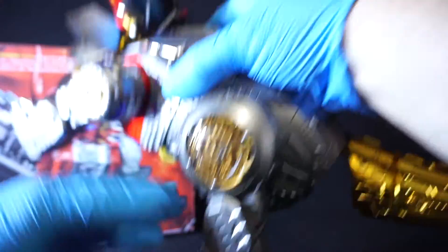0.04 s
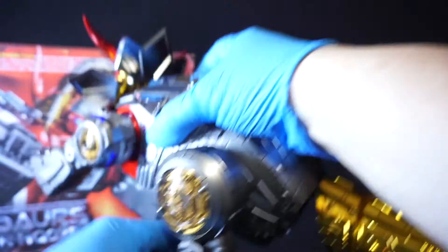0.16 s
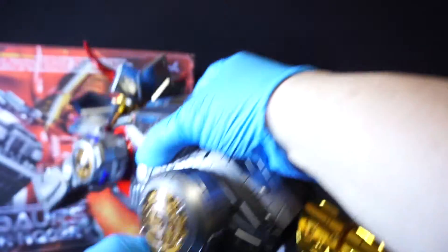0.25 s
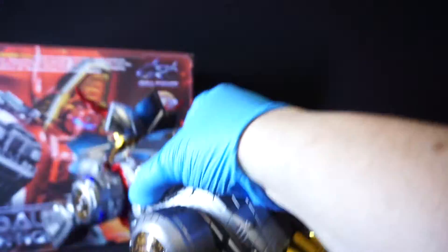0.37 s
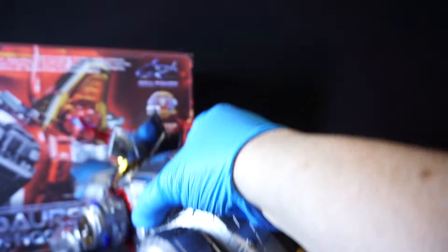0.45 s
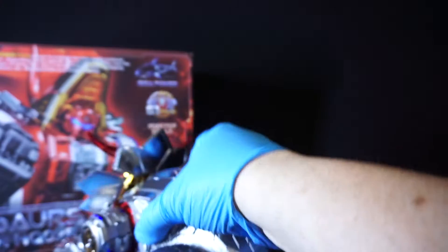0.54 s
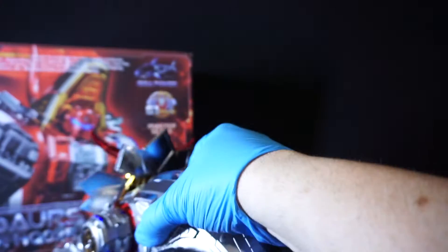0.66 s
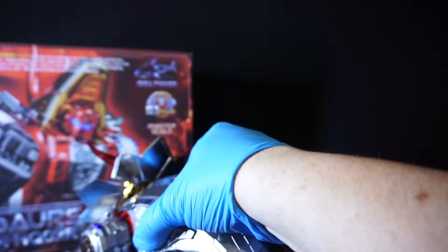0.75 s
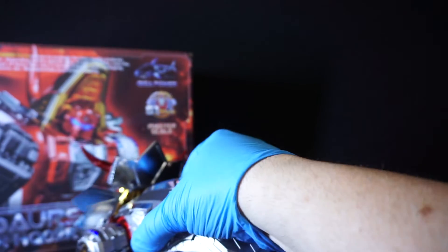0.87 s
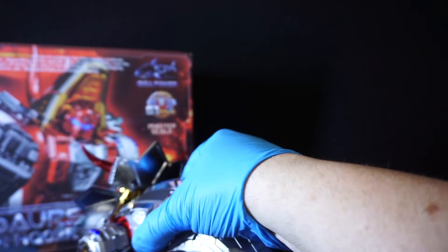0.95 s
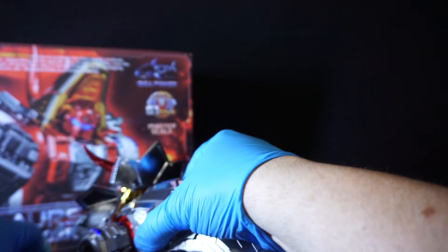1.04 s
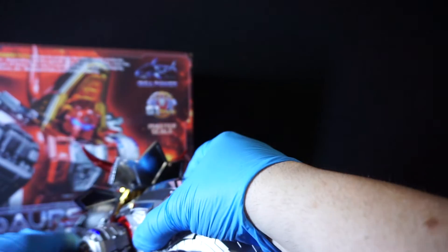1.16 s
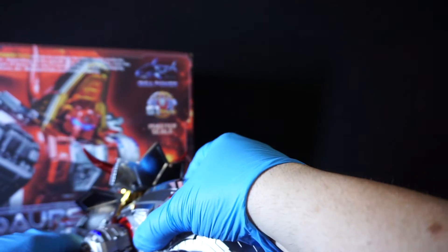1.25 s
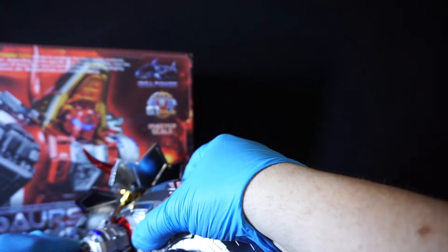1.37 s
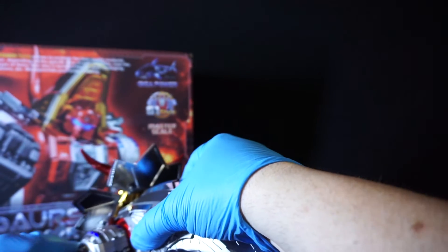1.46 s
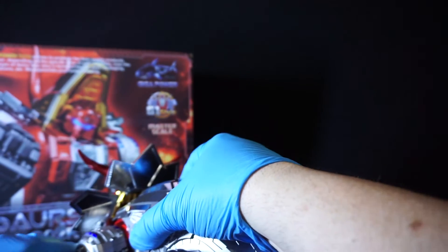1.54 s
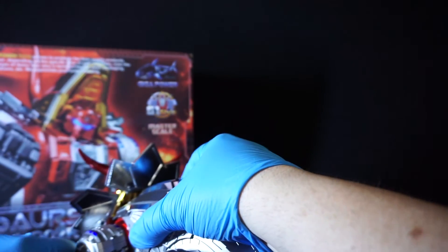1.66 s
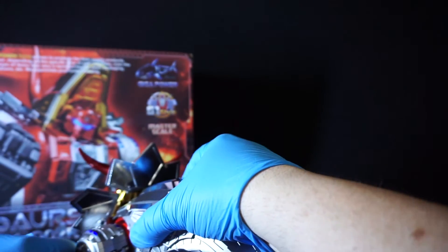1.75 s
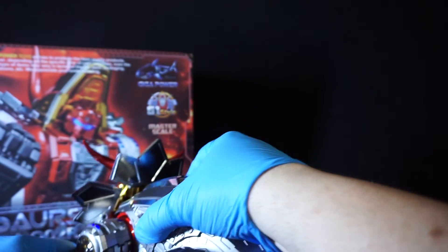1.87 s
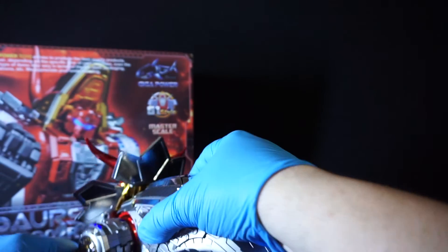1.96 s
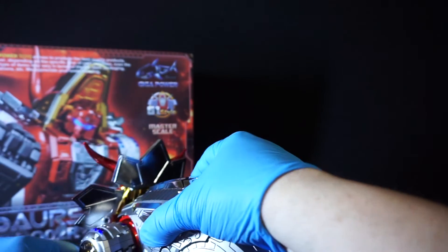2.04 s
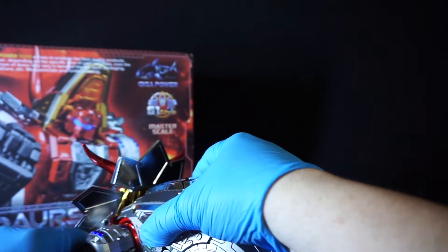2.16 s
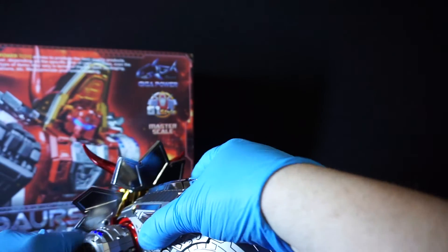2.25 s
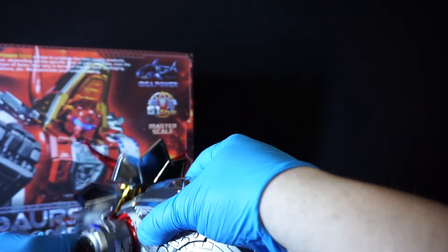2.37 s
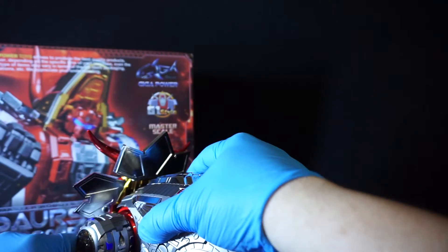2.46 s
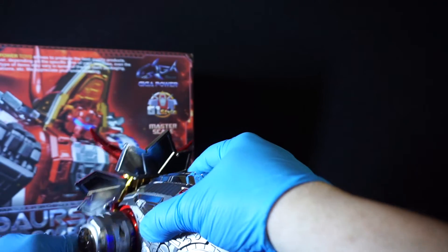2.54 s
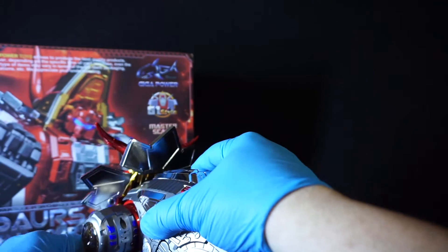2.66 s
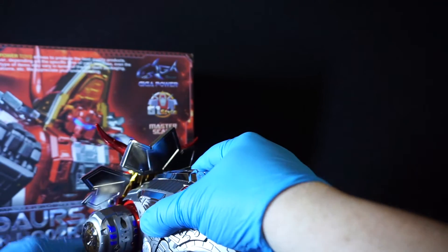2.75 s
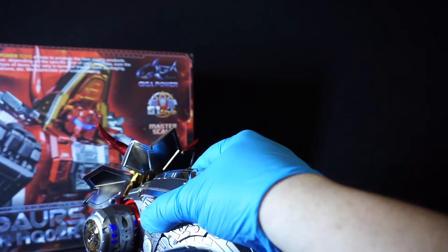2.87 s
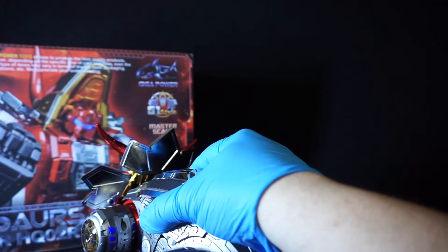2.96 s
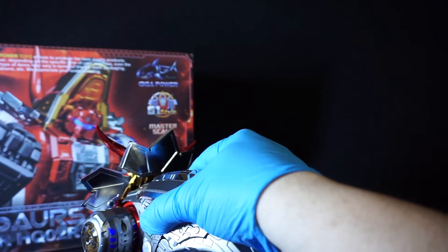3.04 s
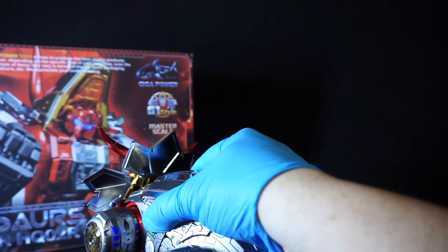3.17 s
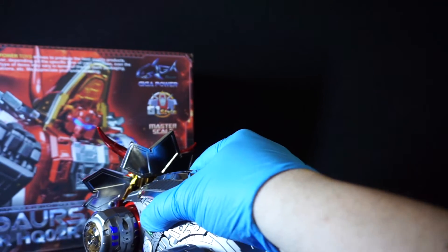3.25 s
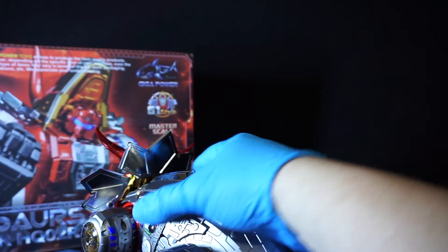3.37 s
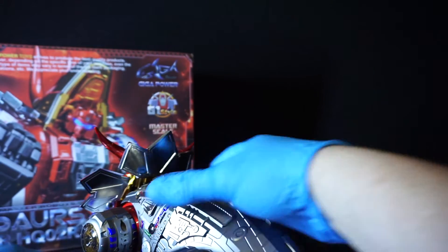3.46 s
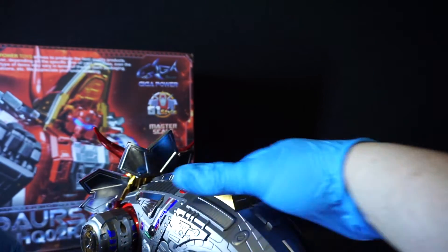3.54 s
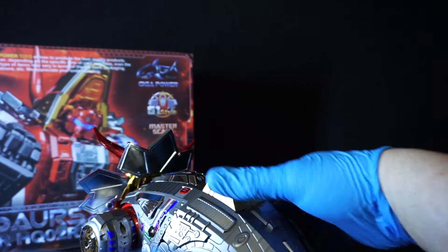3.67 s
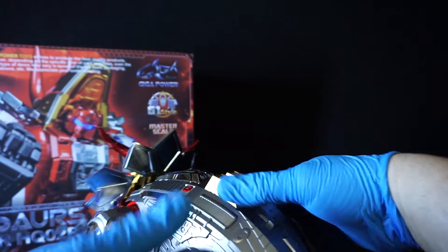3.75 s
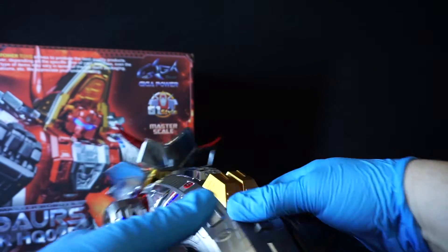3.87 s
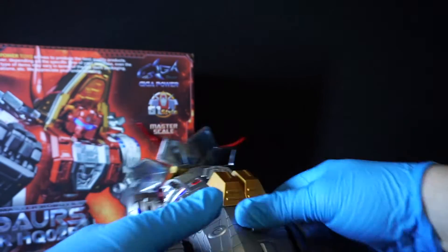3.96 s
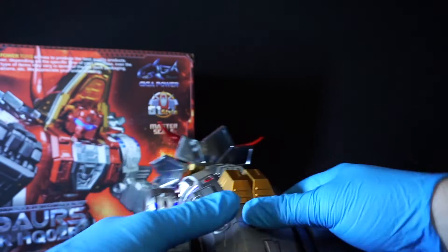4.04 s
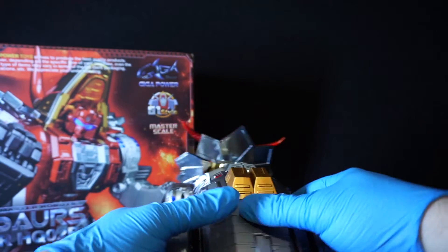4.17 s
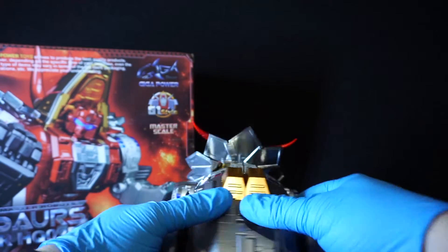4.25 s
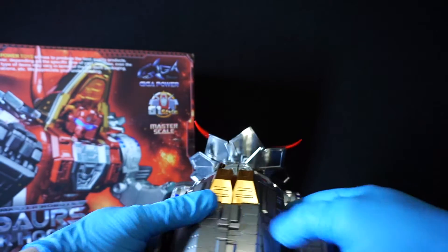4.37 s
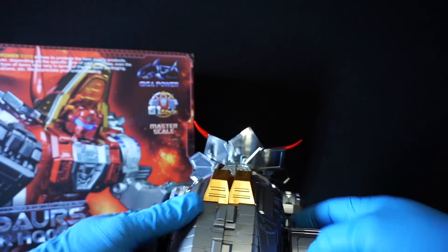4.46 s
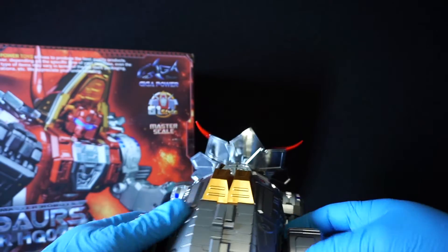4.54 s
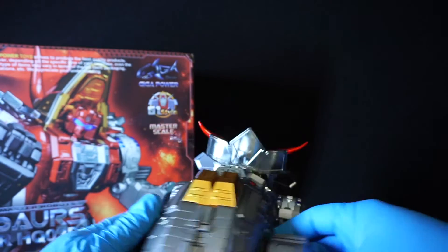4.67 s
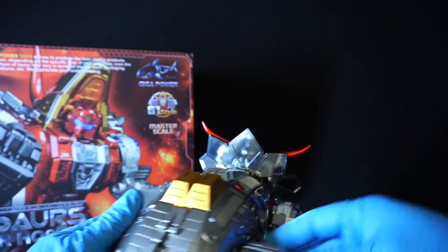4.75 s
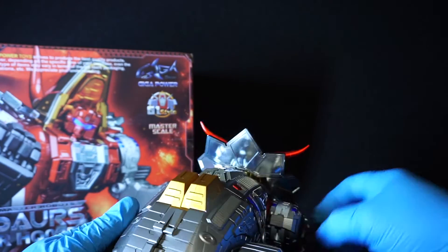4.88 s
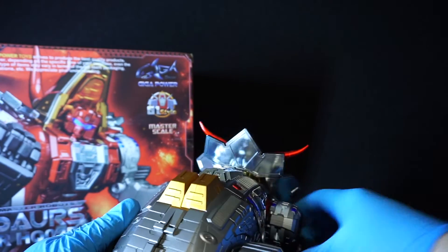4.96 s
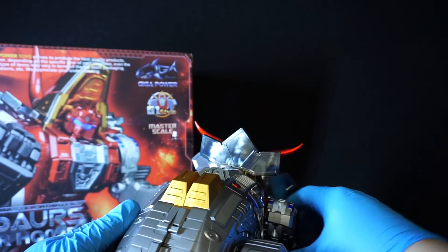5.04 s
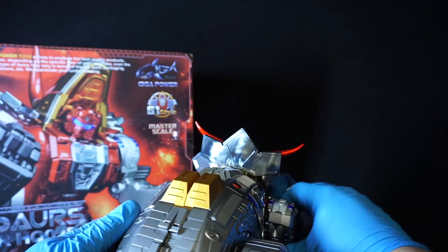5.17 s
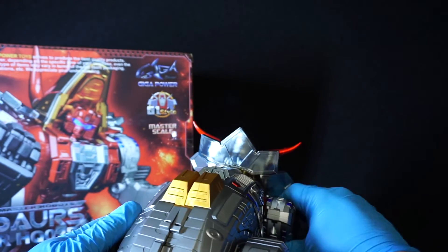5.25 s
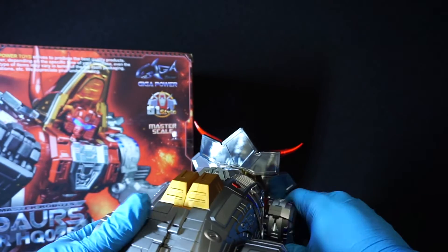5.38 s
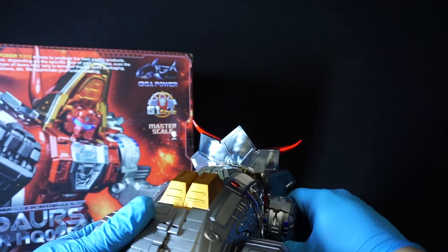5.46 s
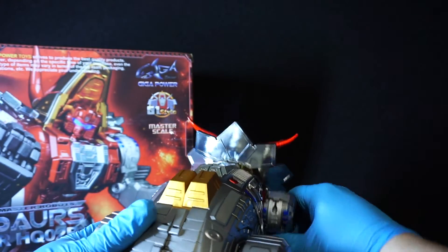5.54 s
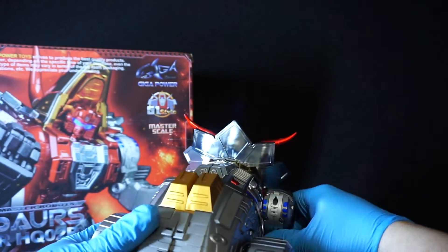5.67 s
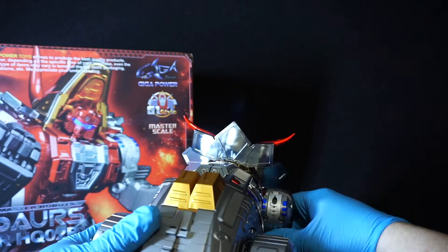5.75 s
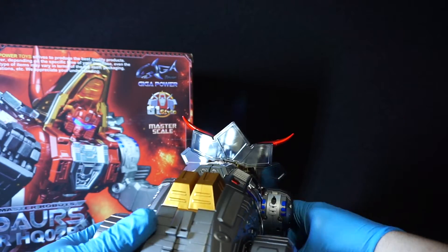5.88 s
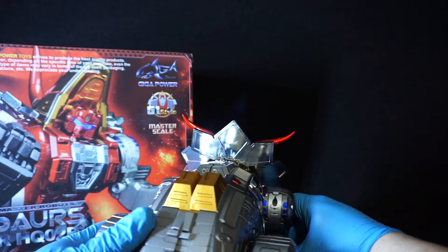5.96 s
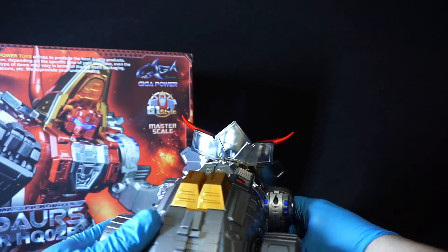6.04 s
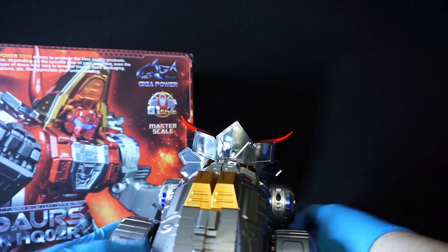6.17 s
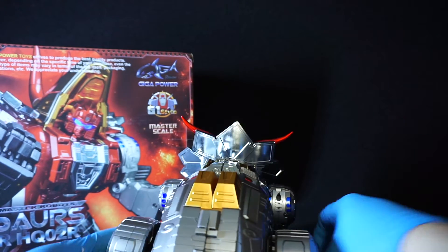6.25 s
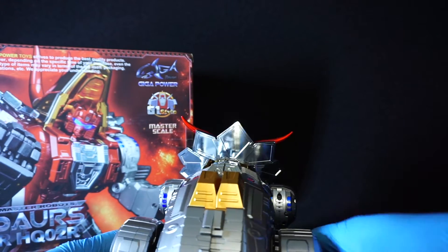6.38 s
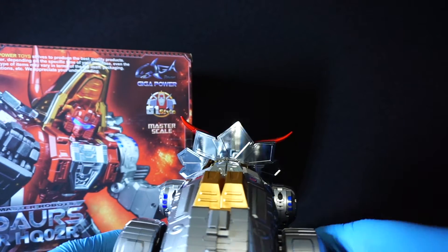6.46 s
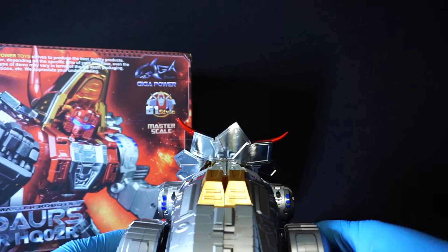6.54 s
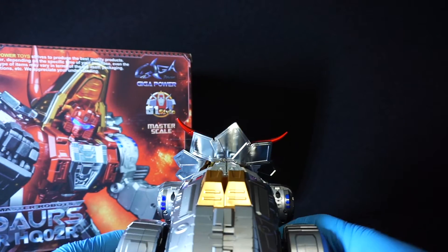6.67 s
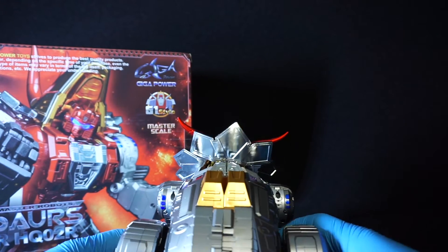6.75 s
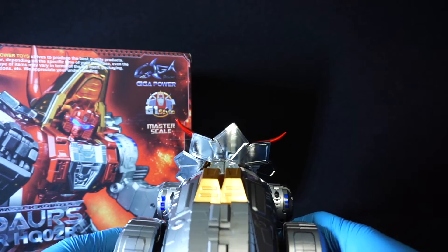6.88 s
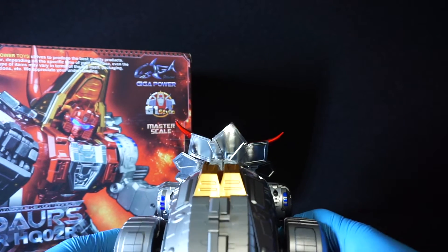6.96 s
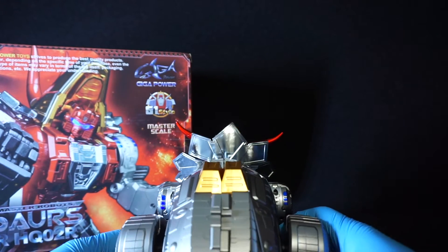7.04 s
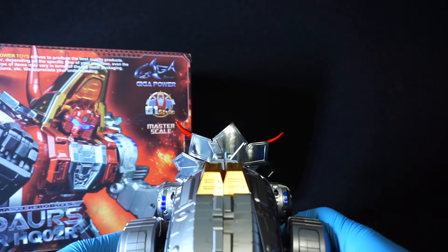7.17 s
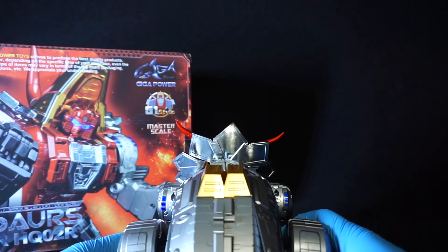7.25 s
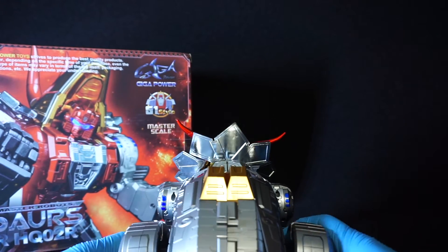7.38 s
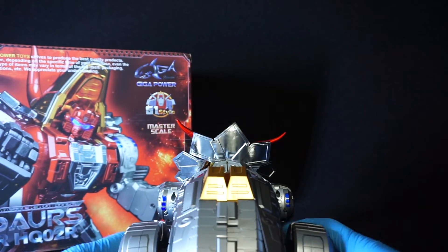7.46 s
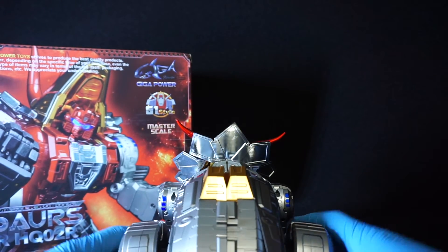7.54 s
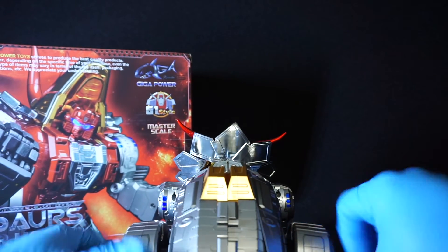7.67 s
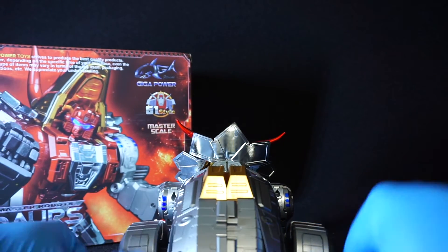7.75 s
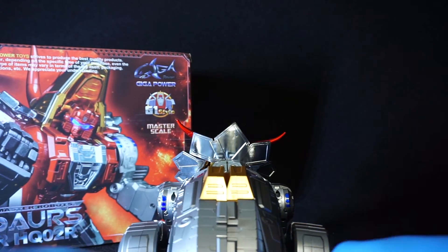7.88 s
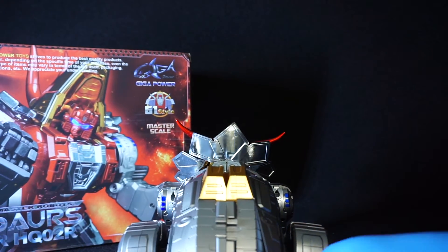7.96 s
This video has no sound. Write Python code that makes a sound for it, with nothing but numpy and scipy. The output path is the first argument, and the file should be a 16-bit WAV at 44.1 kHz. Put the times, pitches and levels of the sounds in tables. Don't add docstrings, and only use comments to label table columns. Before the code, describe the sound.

Close, busy handling of a big plastic toy: sharp clacks, rubbery rubs, woody scrapes, two bursts of bright ratchet snaps, then quieter small clicks.

```python
import sys
import numpy as np
from scipy import signal
from scipy.fft import rfft, irfft, next_fast_len
from scipy.io import wavfile
from scipy.ndimage import uniform_filter1d

SR = 44100
rng = np.random.default_rng(int(sys.argv[2]) if len(sys.argv) > 2 else 0)


def amplitude_ratio(level_db):
    exponent = np.asarray(level_db, float) / 20
    return 10 ** exponent


def master_out(mix):
    frames = np.transpose(np.atleast_2d(mix))
    ceiling = np.clip(frames, -1, 1)
    pcm = np.round(ceiling * 32767).astype(np.int16)
    wavfile.write(sys.argv[1], SR, pcm)


N = 353241
ECHO_S = .0075


def evened(x):
    return x / np.sqrt(np.mean(x ** 2) + 1e-20)


def read(points, hz):
    f, value = np.transpose(points)
    return np.interp(np.log(hz + 1), np.log(f + 1), value)


def add(mix, s, sound):
    part = mix[..., round(s * SR):][..., :sound.shape[-1]]
    part += sound[..., :part.shape[-1]]


def echoed(x, delay_s, db):
    return amplitude_ratio(db) * np.roll(x, round(delay_s * SR), 1)


def side_gain(left_minus_right_db):
    return amplitude_ratio(np.array([[.5], [-.5]]) * left_minus_right_db)


# (frequency [Hz], likeness [0 to 1])
LIKENESS = [(60, 0.96), (150, 0.93), (300, 0.52), (700, 0.67), (1300, 0.28), (2500, 0.54), (6000, 0.025),
            (12000, 0.023)]


def noise(spectrum, patchy_db, n_samples, size=512):
    hop = size // 2
    hz = np.fft.rfftfreq(size, 1 / SR)
    a, b, c, d, patches = rng.standard_normal((n_samples // hop + 5, len(hz), 5)).T
    patches = uniform_filter1d(patches, size=6, axis=0)
    patches = evened(uniform_filter1d(patches, size=4, axis=1))
    same = np.clip(read(LIKENESS, hz), -1, 1)[:, None]
    left = a + 1j * b
    right = same * left + np.sqrt(1 - same ** 2) * (c + 1j * d)
    z = np.array([left, right]) * amplitude_ratio(read(spectrum, hz)[:, None] + patchy_db * patches)
    return evened(signal.istft(z, nperseg=size, noverlap=size - hop)[1][:, :n_samples])


def strokes(rows, rise, fall, rest_db):
    t = np.arange(N) / SR
    power = amplitude_ratio(2 * rest_db)
    for s, hold, db in rows:
        before, after = np.maximum(s - t, 0), np.maximum(t - s - hold, 0)
        power = power + amplitude_ratio(2 * (db - rise * before - fall * after))
    return np.sqrt(power)


def ring(lo_hz, hi_hz, t60):
    t = np.arange(int(t60 * 1.2 * SR)) / SR
    count = int(np.clip((hi_hz - lo_hz) / 150, 5, 36))
    place, size, phase, turn = rng.random((4, 50, 1))[:, :count]
    hz = lo_hz + (hi_hz - lo_hz) * (np.arange(count)[:, None] + place) / count
    turn = (turn - .5) * 2.4 * (1 - np.clip(read(LIKENESS, hz), 0, 1))
    onset = 1 - np.exp(-t / (.0003 + .15 / lo_hz))
    fade = amplitude_ratio(-60 * t / (t60 * (.7 + .6 * size))) * onset
    both = [(fade * np.sin(2 * np.pi * (hz * t + phase) + side * turn)).sum(0) for side in (1, -1)]
    return np.array(both) / np.abs(both).max()


def room_tail(power, parts, diffuse, swell_s):
    out = np.zeros((2, N))
    size = next_fast_len(N)
    hz = np.fft.rfftfreq(size, 1 / SR)
    for impulses, (lo, hi, _, t60) in zip(power, parts):
        dying = signal.lfilter([1], [1, -amplitude_ratio(-60 / t60 / SR) ** 2], impulses)
        swelling = signal.lfilter([1], [1, -np.exp(-1 / (swell_s * SR))], impulses)
        band = [(max(.78 * lo, lo - 1500), -30), (lo, 0), (hi, -3), (min(1.4 * hi, hi + 1700), -30)]
        tail = irfft(diffuse * amplitude_ratio(read(band, hz)), size)[:, :N]
        out += np.sqrt(abs(dying - swelling)) * evened(tail)
    return out


def strikes(rows, parts, diffuse, db, room_db, echo_db, swell_s=0.0077, bounce_db=-80, far_db=-18):
    out, power = np.zeros((2, N)), np.zeros((len(parts), N))
    for s, peak_db, *shares_db in rows:
        blow_db = db + peak_db + .5 * max(peak_db + 26.5, 0)
        side = side_gain(sum(shares_db[len(parts):]))
        for k, (lo, hi, t60, _) in enumerate(parts):
            part_db = blow_db + shares_db[k]
            add(out, s, amplitude_ratio(part_db) * side * ring(lo, hi, t60))
            power[k, round((s + .004) * SR)] += amplitude_ratio(2 * (part_db + room_db))
    out += echoed(out, .0017, bounce_db)
    out += echoed(out, ECHO_S, echo_db) + echoed(out, .0243, far_db)
    return out + room_tail(power, parts, diffuse, swell_s)


# (middle [s], half length [s], dip [dB], above 0 no drop)
LULLS = [(.12, 0.1, -1.5), (0.497, 0.034, -2.5), (1.084, .03, 4), (3.012, .02, -4), (3.26, .05, 3),
         (3.53, 0.11, -1), (4.9, .04, 17), (5.202, 0.029, 1), (5.904, .04, -6), (6.286, 0.086, -3.5),
         (6.624, 0.043, -4.5), (6.738, 0.032, -5.5), (7.166, 0.068, -5), (7.326, 0.043, -9)]


def lulls():
    t = np.arange(N) / SR
    return amplitude_ratio(sum(np.minimum(db, 0) * np.exp(-((t - s) / half) ** 4) for s, half, db in LULLS))


# (frequency [Hz], level [dB per Hz])
AIR = [(12, -47), (20, -30), (135, 14), (492, -16.5), (863, 4), (1280, -45), (3140, -34), (12800, -8.5),
       (15200, -19), (16500, -9)]


def still_air():
    return amplitude_ratio(-61.5) * lulls() * noise(AIR, 0.23, N, size=1024)


# (time [s], level [dB])
LOAD = [(0, -57.5), (.45, -62), (.7, -50), (1.0, -60.5), (1.55, -55), (2.2, -50), (2.45, -50.5),
        (2.76, -70.5), (3.1, -50.5), (3.52, -60.5), (3.8, -65.5), (4.25, -65.5), (5.1, -58.5), (5.4, -58),
        (5.78, -59), (5.95, -74.5), (7.6, -63), (8.0, -57.5)]
# (frequency [Hz], level [dB per Hz])
RUMBLE = [(20, -31), (50, -11), (86, -20.5), (136, -0.5), (151, -6.5), (183, -13.5), (274, -5.5),
          (329, -16.5), (375, -11), (450, -10), (580, -48), (990, -120)]


def rumble():
    load_db = np.interp(np.arange(N) / SR, *np.transpose(LOAD))
    return amplitude_ratio(2.0 + load_db) * noise(RUMBLE, 4.4, N, size=2048)


# (start [s], hold [s], level [dB])
SWAYS = [
    (.5, .25, -54.5),
    (1.1, 0.34, -57.5),
    (1.9, 0.076, -51),
    (3.05, 0.2, -63),
    (3.7, 0.23, -56),
    (4.5, 0.79, -64),
    (5.25, 0.074, -60),
    (5.38, 0.36, -45),
    (6.8, 0.14, -64),
    (7.55, 0.41, -63),
]
# (frequency [Hz], level [dB per Hz])
SWAY = [(12, -37), (22, -9), (70, -3.5), (110, -6.5), (200, -58)]


def sway():
    return strokes(SWAYS, 120, 88, -72) * noise(SWAY, 4.5, N, size=4096)


# (start [s], hold [s], level [dB])
SLIDES = [(0, 0.056, -59.5), (5.98, 0.033, -59), (.44, 0.21, -57), (1.3, 0.23, -55.5), (1.8, .06, -53),
          (2.13, 0.2, -48), (2.45, 0.02, -38.5), (2.76, 0.022, -53.5), (3.07, 0.11, -50),
          (4.38, 0.093, -54), (4.57, 0.17, -54.5), (4.72, 0.13, -52), (5.1, 0.036, -67), (5.4, 0.32, -40.5),
          (6.07, 0.026, -64.5), (6.5, 0.047, -57), (6.86, 0.12, -66.5), (7.68, .03, -83)]
# (rise [dB/s], fall [dB/s], rest level [dB])
SLIDE_SHAPE = (125, 310, -69)
# (frequency [Hz], level [dB per Hz])
SLIDE = [(150, -24), (250, -30), (414, -19), (451, -19), (795, 18), (915, 10), (1030, -85), (1600, -7),
         (2080, -54), (3520, -120)]


def slides():
    return strokes(SLIDES, *SLIDE_SHAPE) * noise(SLIDE, 3.0, N)


# (start [s], hold [s], level [dB])
DRAGS = [(0, 0.077, -63.5), (.42, 0.099, -54.5), (1.3, 0.15, -53.5), (1.49, 0.056, -49),
         (1.65, 0.045, -54.5), (1.84, 0.052, -40), (1.95, 0.19, -48.5), (2.41, 0.08, -38.5),
         (2.58, 0.1, -41.5), (3.76, 0.15, -53.5), (4.45, .25, -63), (5.0, 0.26, -62.5), (5.41, 0.33, -41),
         (6.39, 0.23, -64), (6.65, 0.06, -75), (7.19, 0.024, -62), (6.9, 0.29, -60), (7.66, 0.41, -55.5)]
# (rise [dB/s], fall [dB/s], rest level [dB])
DRAG_SHAPE = (270, 250, -69.5)
# (frequency [Hz], level [dB per Hz])
DRAG = [(760, -11.5), (1300, -2), (1630, -5.5), (1910, 1), (2320, -1.5), (2670, -3.5), (4200, -7),
        (5460, -24), (9240, -120)]


def drags():
    return strokes(DRAGS, *DRAG_SHAPE) * noise(DRAG, 2.6, N, size=256)


# (start [s], hold [s], level [dB])
SINGS = [
    (1.46, 0.064, -66),
    (3.76, .18, -54.5),
    (4.03, 0.13, -65),
    (6.65, 0.044, -73),
]
# (frequency [Hz], level [dB per Hz])
SING = [(1500, -40), (1900, -9), (2000, -9), (2250, -37), (2620, -5), (2780, -1), (3200, -17), (4500, -48)]


def sings():
    return strokes(SINGS, 200, 300, -90) * noise(SING, 3.4, N)


# (start [s], hold [s], level [dB])
RUBS = [(.43, 0.037, -48), (.66, 0.044, -36.5), (.85, 0.025, -43.5), (.93, 0.03, -45.5), (1.84, .04, -45),
        (2.12, 0.13, -49.5), (2.78, 0.082, -53), (0.05, 0.13, -67), (1.1, 0.63, -64), (3.34, 0.042, -72),
        (5.15, 0.34, -60), (3.8, 0.15, -46.5), (4.02, 0.48, -47.5), (4.6, 0.099, -43), (4.74, 0.042, -37.5),
        (5.06, 0.027, -47.5), (5.94, 0.061, -46), (6.17, 0.05, -48.5), (6.37, 0.026, -53),
        (6.47, 0.037, -54), (6.65, .06, -59), (6.78, 0.04, -74), (6.9, 0.17, -77), (7.4, 0.063, -59),
        (7.26, 0.085, -72), (3.45, 0.48, -63), (6.04, 0.11, -54), (6.57, 0.038, -67), (7.12, 0.035, -66),
        (2.97, 0.026, -59), (7.5, 0.36, -53), (7.67, 0.038, -47), (7.85, 0.028, -44.5), (7.93, 0.098, -54)]
# (rise [dB/s], fall [dB/s], rest level [dB])
RUB_SHAPE = (226, 246, -61.5)
# (frequency [Hz], level [dB per Hz])
GLOVE = [(2350, -18.5), (3670, -11), (4400, -11.5), (5300, -11), (6300, -12.5), (14700, -14.5),
         (16200, -18), (16500, -54)]


def rubs():
    return strokes(RUBS, *RUB_SHAPE) * noise(GLOVE, 0.52, N, size=256)


def friction_grain():
    slips = amplitude_ratio(0.61 * rng.exponential(1, N)) * (rng.random(N) < 300 / SR)
    return evened(9.0 + signal.lfilter([1], [1, -np.exp(-1 / (0.0085 * SR))], slips))


def hands():
    friction = rubs() + drags() + sings() + slides()
    return friction_grain() * lulls() * friction + rumble() + sway()


# (time [s], strength [dB], boom of the table top [dB])
THUDS = [(0.294, -35, -29), (0.595, -23, 3), (1.116, -46.5, 6), (1.182, -35, -12.5), (1.402, -38.5, -8),
         (1.669, -44, -35), (1.863, -23, 2.5), (2.122, -42, -5), (2.299, -48, -14), (2.375, -40, -21),
         (3.038, -26, 5), (3.107, -22, -3), (3.288, -40, -7), (3.713, -50, 11.5), (3.782, -45, -20),
         (3.881, -38, -32), (4.566, -69.5, 30), (4.661, -43, -1.5), (4.979, -30, -8.5), (5.25, -42.5, -18),
         (6.371, -64, 20), (6.5, -48, -2), (6.805, -55, 3), (6.93, -49, -4), (7.289, -47, -0.5),
         (7.659, -66.5, 22.5)]
# (lowest [Hz], highest [Hz], own t60 [s], room t60 [s])
TABLE = [
    (130, 148, .22, .36),
    (190, 500, .08, .33),
]


def thuds(diffuse):
    rows = [(s, db, boom, 0) for s, db, boom in THUDS]
    return strikes(rows, TABLE, diffuse, db=-2.0, room_db=-9.5, echo_db=-8.0, far_db=-80)


# (time [s], strength [dB], hollow shell [dB], edge tick [dB])
CLACKS = [(0.537, -15, -26, -6.5), (0.863, -29.5, -14.5, -4), (1.01, -29.5, -19, -4.5),
          (1.187, -27.5, -11.5, -18), (1.268, -21, -19, -7), (1.403, -22, -26, -15.5),
          (1.777, -28, -19, -1.5), (1.799, -30, -23, -8), (1.845, -40, -19, -3), (1.858, -5, -25.5, -9.5),
          (1.887, -3.5, -25, -12.5), (1.909, -14, -33, -8), (2.036, -27, -15, -2.5), (2.127, -34, -11, -18),
          (2.149, -24.5, -30, -1.5), (2.3, -33, -11, -15), (2.515, -19, -24, -30), (2.367, -29, -33, -15),
          (2.381, -24.5, -30, -8.5), (3.105, -5, -23, -11), (3.438, -44.5, -16, -27),
          (3.609, -46, -21, -10), (3.708, -25.5, -14, -3), (6.513, -33.5, -15, -31),
          (6.929, -32, -14, -11.5), (7.1968, -30.5, -31, -5.5), (7.203, -30.5, -32, -16),
          (7.664, -38.5, -16, -10)]
# (time [s], strength [dB], hollow shell [dB], edge tick [dB])
FLEXES = [(0.314, -20.5, -45, -3), (1.113, -29, -19, -41), (1.373, -34.5, -13, -14),
          (1.51, -29, -20.5, -38), (1.663, -31, -12.5, -24), (1.732, -31, -16.5, -33),
          (1.813, -28.5, -16, -2), (1.896, -10, -15.5, -20), (1.921, -11, -23, -28), (2.086, -26, -29, -28),
          (2.184, -24, -23.5, -27), (2.251, -29.5, -14, -22), (2.39, -51, -19, -18),
          (2.967, -34.5, -16, -35), (4.819, -22.5, -17.5, -21), (5.971, -32.5, -13, 12.5),
          (7.268, -36, -13, -30)]
# (time [s], strength [dB], hollow shell [dB], edge tick [dB])
CLICKS = [(0.224, -25, -32, 2), (0.294, -17.5, -16.5, -5.5), (0.597, -4.5, -24.5, -4),
          (1.674, -44, -3, -30), (1.758, -32.5, -25, -5), (1.94, -16, -23, -16), (2.296, -32, -28, -4.5),
          (2.892, -34.5, -25, -20), (2.853, -33, -40, -24), (2.875, -38, -26, -1.5),
          (2.924, -30.5, -20, -3), (3.031, -6, -25, -12), (4.235, -39, -18, 2.5), (4.659, -26, -15, -6.5),
          (4.951, -34, -24, -15), (4.967, -17, -21.5, -3.5), (4.977, -16.5, -16.5, -8.5),
          (5.25, -25, -18.5, -9.5), (5.937, -40, -34, -8), (5.944, -35, -61, -8), (5.955, -35.5, -26, 2),
          (5.965, -22.5, -30, -4), (5.984, -26.5, -19, -4.5), (6.362, -40.5, -16, -5),
          (6.399, -46, -13, -8), (6.854, -37, -34, -10), (6.881, -33, -27, -7), (7.191, -33.5, -36, -10),
          (7.2085, -33.5, -29, -9), (7.2143, -31, -33, -7), (4.562, -56, -4, -25), (7.64, -30.5, -26, -4.5)]
# (panel [dB], small plate [dB])
CLACK_DB = (-13.5, -12)
FLEX_DB = (-13.5, -19)
CLICK_DB = (-16, -9.5)
# (time [s], strength [dB], hardness [dB])
KNOCKS = [(0.016, -41, -8), (0.15, -40, -12), (0.35, -27.5, -8), (0.557, -25.5, -6), (0.589, -23, -8),
          (0.725, -25, 2), (0.83, -38.5, -2), (2.139, -29.5, -4), (2.155, -27, -3), (2.205, -44, -10),
          (2.225, -44, -8), (2.272, -40, -1), (2.301, -29, -0.5), (2.33, -38, -5), (2.345, -38, -12),
          (2.388, -32.5, -3.5), (2.508, -26, -4), (3.81, -43, -2), (3.93, -42.5, 1.5), (4.56, -63, -4),
          (3.259, -33, -13), (3.288, -34, -12), (3.324, -38, -3), (3.353, -36.5, -5.5), (3.881, -35, 3),
          (5.016, -24.5, -7), (5.066, -42, 4), (7.276, -39.5, -7), (7.305, -39, -7.5)]
# (shell [dB], panel [dB], plate [dB], edge [dB])
KNOCK_DB = (-5.5, -11.5, -12.5, -23)
# (shell, panel, plate, edge) [dB per dB of hardness]
HARDNESS = (0.64, 0.48, 2, 4)


def blows():
    rows = []
    for table, body in ((CLACKS, CLACK_DB), (FLEXES, FLEX_DB), (CLICKS, CLICK_DB)):
        rows += [(s, db, shell, *body, edge - 2.5) for s, db, shell, edge in table]
    for s, db, hard in KNOCKS:
        rows.append((s, db, *np.add(KNOCK_DB, np.multiply(hard, HARDNESS))))
    tops = [5 + 1.68 * min(row[-1], -3.5) for row in rows]
    return [(*row, top, top - 5.0) for row, top in zip(rows, tops)]


# (lowest [Hz], highest [Hz], own t60 [s], room t60 [s])
PARTS = [
    (600, 1050, .04, .24),
    (1050, 2700, .019, .22),
    (2700, 5300, .015, .2),
    (5300, 9000, .012, .12),
    (9000, 13000, .010, .065),
    (13000, 16500, .008, .05),
]


def panels(diffuse):
    return strikes(blows(), PARTS, diffuse, db=8.5, room_db=-19.0, echo_db=-10.0)


# (time [s], strength [dB], low note [Hz], high note [Hz], high note [dB])
NOTES = [(0.2239, -52, 1660, 4790, 2), (0.2941, -21.5, 1500, 3000, 3.5), (0.5372, -21, 2280, 4450, 1),
         (0.596, -14.5, 1300, 4660, 14), (1.0089, -37.5, 860, 2930, -3), (1.1114, -32.5, 2050, 2970, -2),
         (1.1859, -44, 895, 2480, 9), (1.2675, -23, 2370, 3890, -4), (1.4032, -24, 2320, 4170, 0),
         (1.51, -38, 2350, 4270, -1), (1.6622, -47, 890, 2560, 9), (1.6727, -36.5, 2370, 2950, 0),
         (1.731, -38, 2430, 2800, 3), (1.7604, -37, 1910, 4600, 0), (1.78, -30, 1910, 4600, -3),
         (1.7988, -34, 890, 3400, 2), (1.811, -40, 902, 2880, 3), (1.8581, -18.5, 2120, 2610, 10),
         (1.8866, -13, 2060, 2530, 2.5), (2.0354, -30, 1870, 3730, -4), (2.087, -33, 2335, 2900, -3),
         (2.1484, -35, 920, 4070, 8), (2.1843, -30, 890, 3050, -9), (2.8754, -39, 2100, 4500, 5),
         (2.924, -49, 970, 4440, 10), (3.0315, -16, 930, 3770, 7), (3.1039, -10.5, 946, 3480, 4.5),
         (3.709, -29, 1920, 3170, -2), (4.8202, -35, 1060, 2730, 10.5), (4.9666, -37, 885, 3670, 23),
         (5.25, -35, 845, 3130, -5), (5.9644, -33, 2040, 5270, 12), (6.359, -49, 880, 4580, 10),
         (6.513, -36.5, 1110, 4070, -8), (6.9326, -38, 2420, 2540, -4), (7.197, -31.5, 2730, 5080, 0),
         (7.6415, -41, 2060, 4300, 5)]
# (low t60 [s], high t60 [s])
NOTE_T60 = (0.039, 0.038)
# (time [s], strength [dB], low note [Hz], high note [Hz], high note [dB])
BODY = [
    (1.114, -35, 272, 392, 1),
    (1.126, -35, 408, 332, -13),
    (1.405, -35, 2330, 4200, -6),
    (1.5, -42, 2340, 2930, 6),
    (3.883, -38, 480, 1310, -4),
    (4.821, -37, 1075, 1430, 5),
    (5.961, -41, 400, 1310, -2),
    (6.81, -43, 244, 420, -12),
    (7.268, -38.5, 803, 1480, -4),
    (7.204, -50, 2620, 5000, 0),
]
# (low t60 [s], high t60 [s])
BODY_T60 = (0.093, 0.12)


def notes():
    out = np.zeros((2, N))
    spread = 0.035
    for rows, t60s in ((NOTES, NOTE_T60), (BODY, BODY_T60)):
        for s, db, low_hz, high_hz, high_db in rows:
            blow_db = -4 + db + .5 * max(db + 30.5, 0)
            for hz, share_db, t60 in zip((low_hz, high_hz), (0, high_db), t60s):
                cluster = ring(hz * (1 - spread), hz * (1 + spread), t60)
                add(out, s, amplitude_ratio(blow_db + share_db) * cluster)
    return out + echoed(out, ECHO_S, -39.0)


# (time [s], strength [dB], left minus right [dB])
HIP_SNAPS = [
    (2.4003, -14.5, 2),
    (2.4324, -14.5, 1),
    (2.563, -12.5, 4),
    (2.6132, -17.5, 3),
]
# (pawl [dB], housing [dB], tooth [dB], tooth edge [dB], spring [dB])
HIP_DB = (-6.5, 4, 6.5, -12, 0.5)
# (lowest [Hz], highest [Hz], own t60 [s], room t60 [s])
HIP_PAWL = [
    (3480, 3890, 0.012, 0.31),
    (2940, 20000, 0.013, 0.31),
    (6810, 18000, 0.0085, 0.2),
    (14100, 21000, .012, 0.17),
    (9940, 15300, .009, .22),
]
# (time [s], strength [dB], left minus right [dB])
LEG_SNAPS = [
    (5.3553, -10.5, -3.5),
    (5.4307, -10, -4.5),
    (5.5472, -12.5, -6.5),
    (5.5925, -11, -7.5),
    (5.6716, -11, -13),
]
# (pawl [dB], housing [dB], tooth [dB], tooth edge [dB])
LEG_DB = (-11.5, -1.5, 1.5, -5.5)
# (lowest [Hz], highest [Hz], own t60 [s], room t60 [s])
LEG_PAWL = [
    (3480, 3870, 0.014, 0.28),
    (2960, 18000, 0.0083, 0.29),
    (8930, 12600, 0.0073, 0.25),
    (12800, 15500, 0.0066, 0.2),
]


def ratchet_snaps(diffuse):
    out = np.zeros((2, N))
    for snaps, joint, parts in ((HIP_SNAPS, HIP_DB, HIP_PAWL), (LEG_SNAPS, LEG_DB, LEG_PAWL)):
        rows = [(s, db, *joint, pan) for s, db, pan in snaps]
        out += strikes(rows, parts, diffuse, db=12.5, room_db=-16, echo_db=-9.0,
                       swell_s=0.013, bounce_db=-3, far_db=-13.5)
    return out


# (time [s], left minus right [dB])
LEAN = [(0, -1.5), (3, 0.5), (4.5, -3.5), (8, -2.5)]


def leaned(toy):
    side = side_gain(np.interp(np.arange(N) / SR, *np.transpose(LEAN)))
    low = signal.sosfiltfilt(signal.butter(2, 2500, fs=SR, output="sos"), toy)
    return toy + (side - 1) * (toy - low)


def scene():
    diffuse = rfft(noise([(20, 0), (20000, 0)], 2.5, N, size=256), next_fast_len(N))
    toy = hands() + thuds(diffuse) + panels(diffuse) + notes()
    return still_air() + leaned(toy) + ratchet_snaps(diffuse)


def gain_control(x):
    power_db = 10 * np.log10(abs(uniform_filter1d((x ** 2).mean(0), size=130)) + 1e-12)
    fall = np.arange(N) * 150 / SR
    held_db = np.maximum.accumulate(power_db + fall) - fall
    over_db = np.maximum(held_db + 32, 0)
    x = x / amplitude_ratio(.5 * uniform_filter1d(over_db, size=90, origin=-42))
    jump_db = np.maximum(np.roll(over_db, -66) - np.roll(over_db, 40), 0)
    x = x / amplitude_ratio(.8 * uniform_filter1d(jump_db, size=30))
    return .68 * np.tanh(x / .68)


def band_limit(x):
    out = 0
    for hz, share in ((15740, .96), (16500, .04)):
        out = out + share * signal.sosfilt(signal.ellip(9, .3, 70, hz, fs=SR, output="sos"), x)
    return out


def top_cut(x):
    return signal.sosfilt(signal.butter(12, 16810, fs=SR, output="sos"), x)


def record(dry):
    ports = np.array([dry[0], np.roll(dry[1], 2)])
    mix = band_limit(gain_control(ports))
    return top_cut(mix)


dry = scene()
out = record(dry)
master_out(out)
```